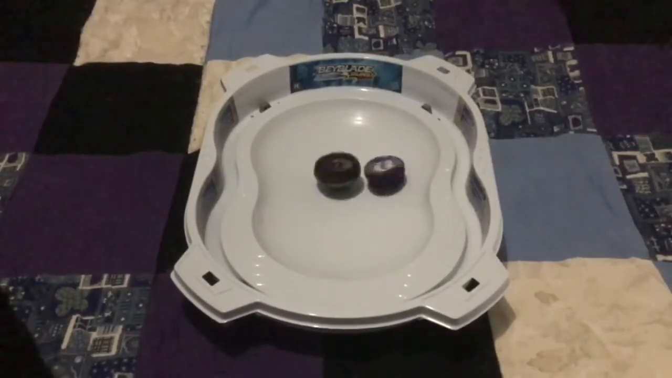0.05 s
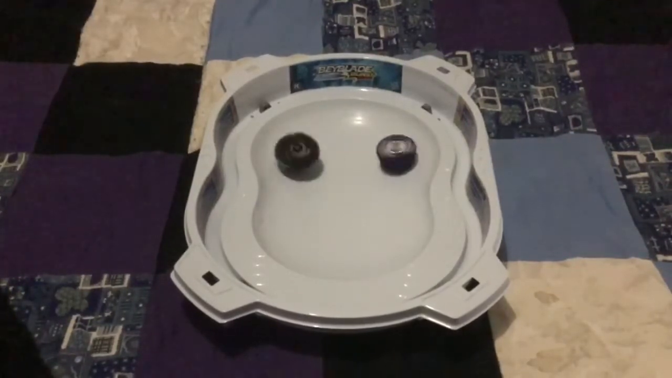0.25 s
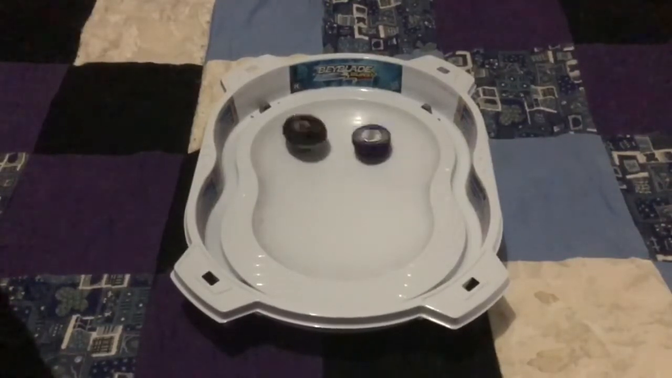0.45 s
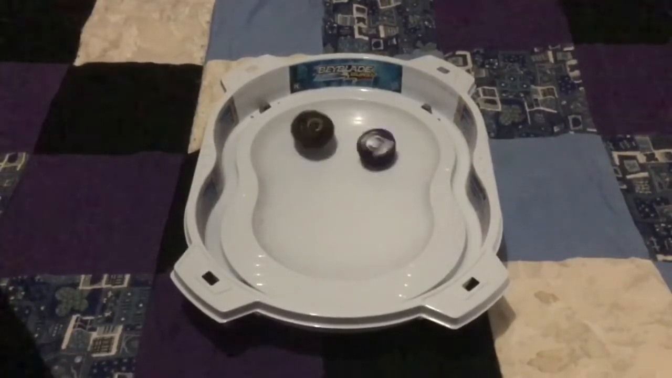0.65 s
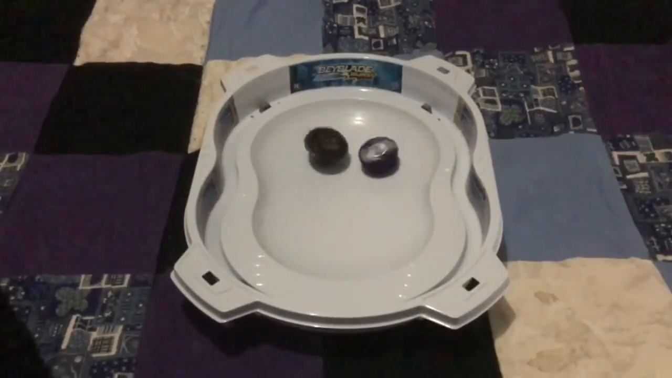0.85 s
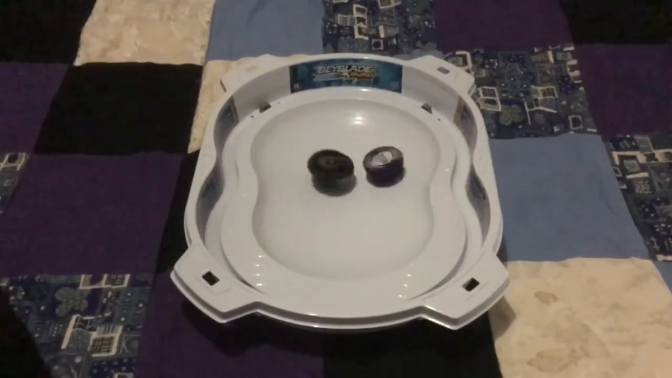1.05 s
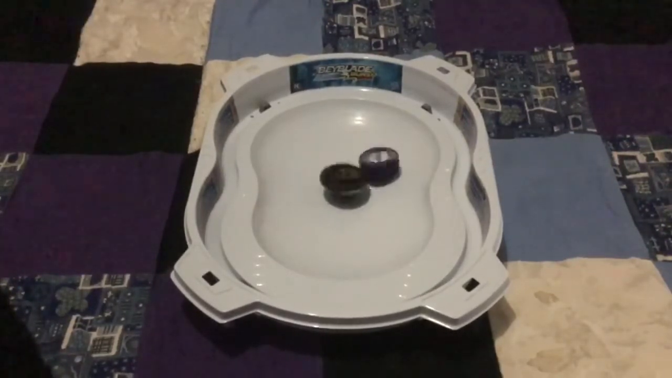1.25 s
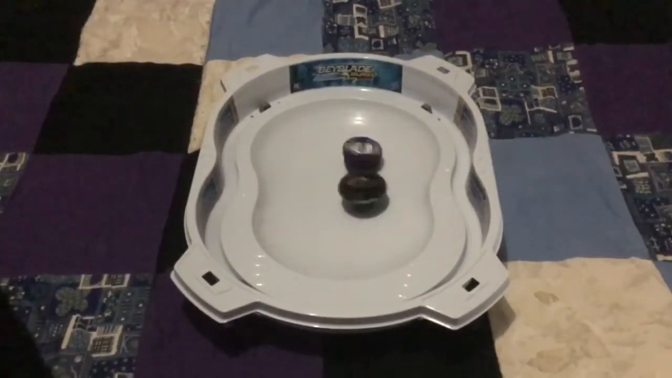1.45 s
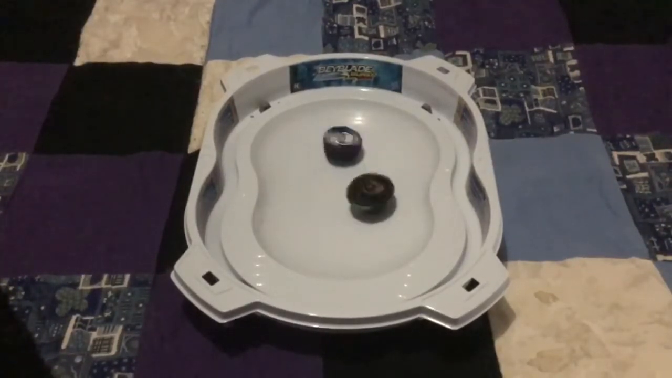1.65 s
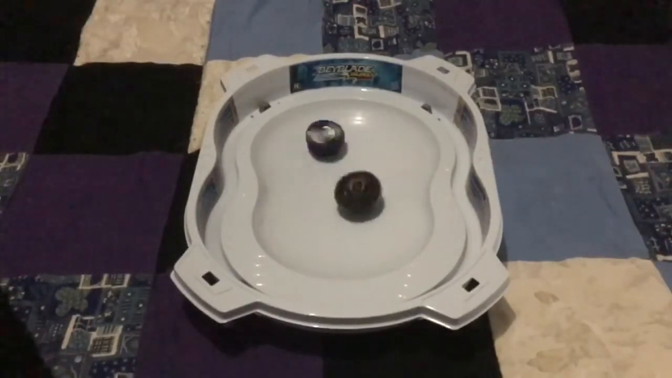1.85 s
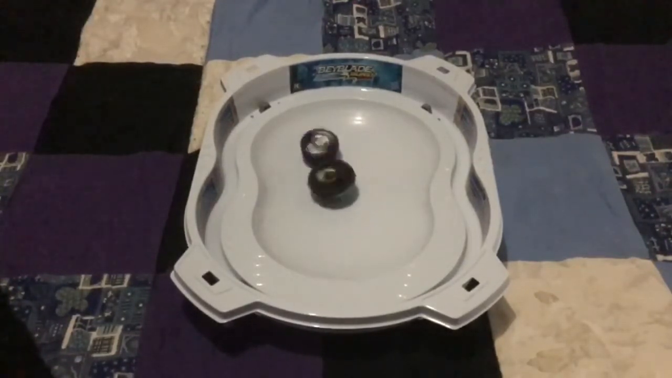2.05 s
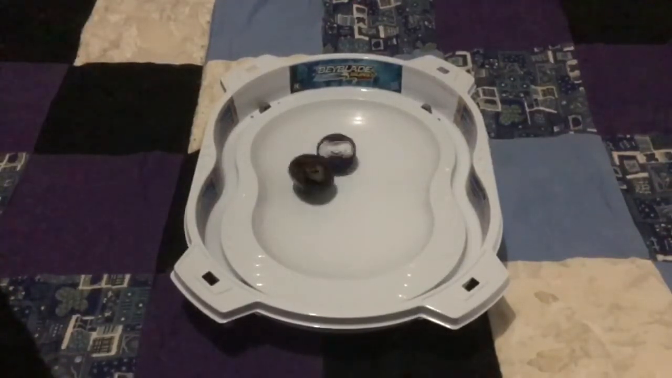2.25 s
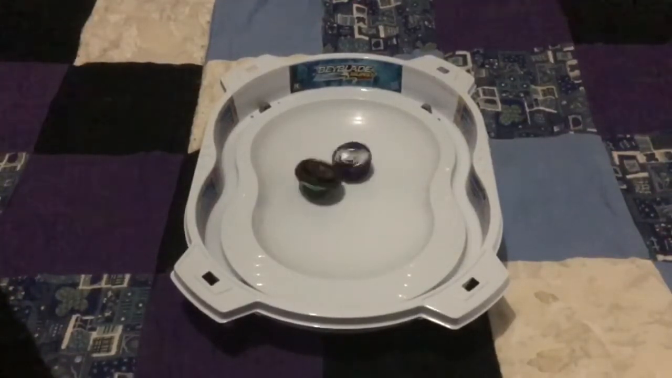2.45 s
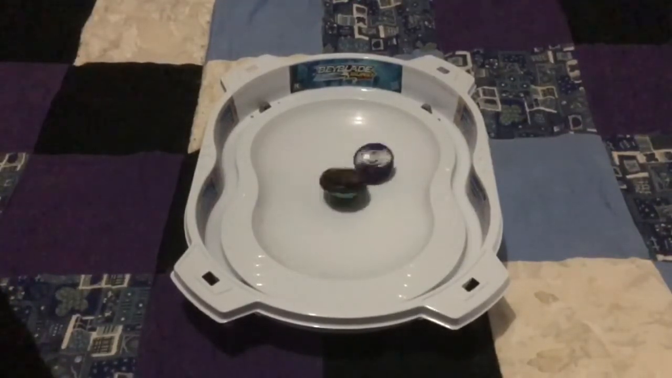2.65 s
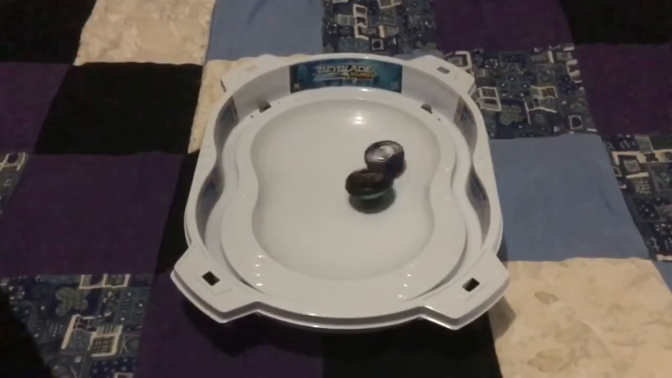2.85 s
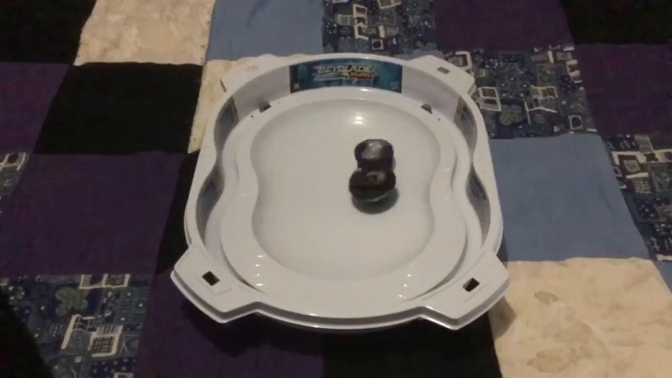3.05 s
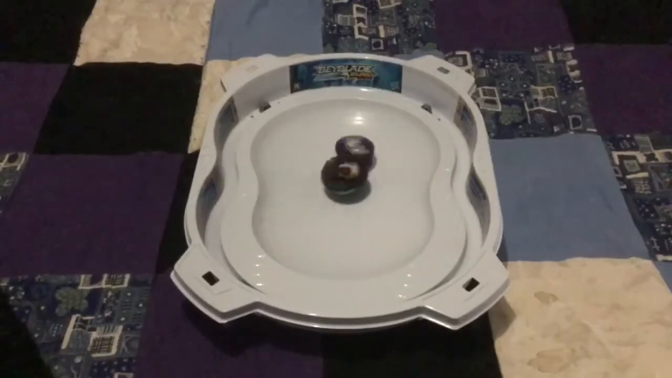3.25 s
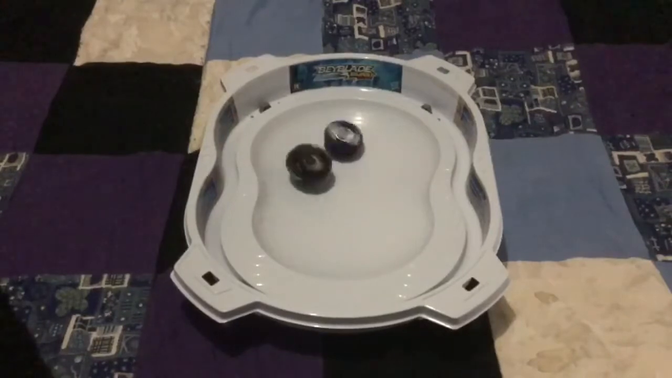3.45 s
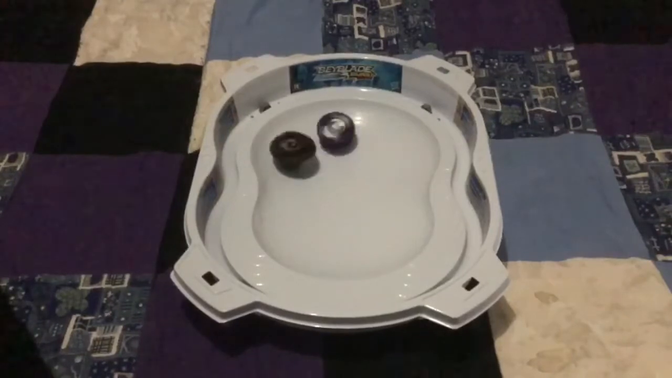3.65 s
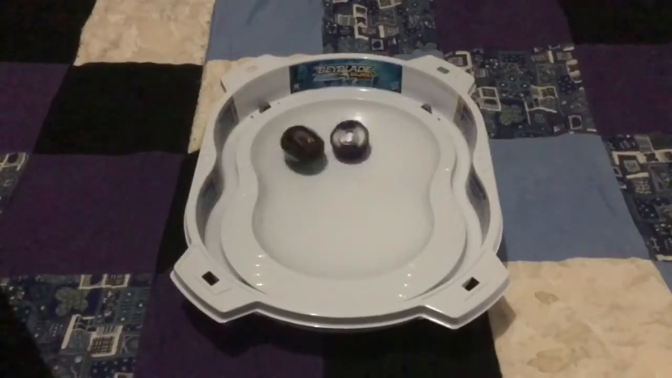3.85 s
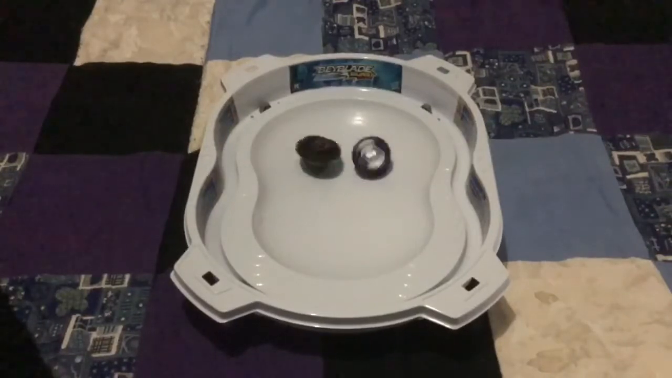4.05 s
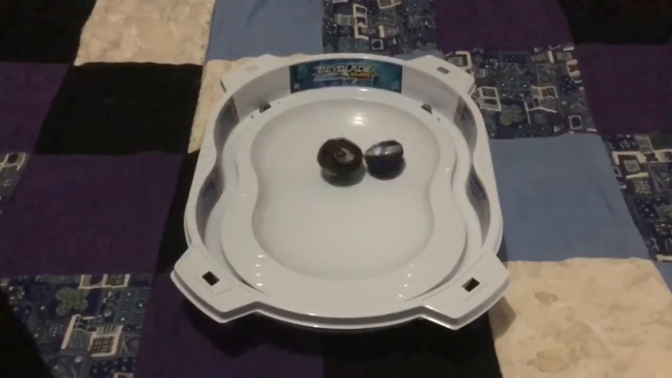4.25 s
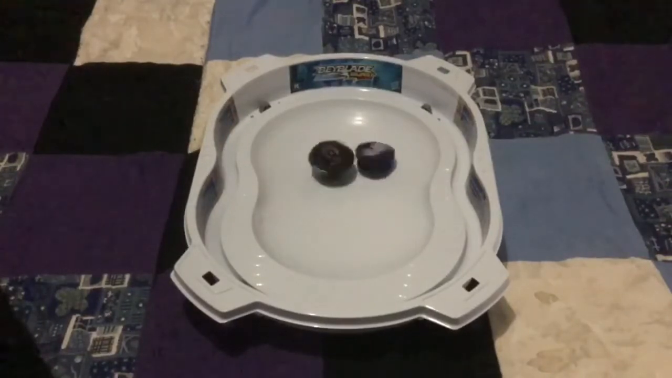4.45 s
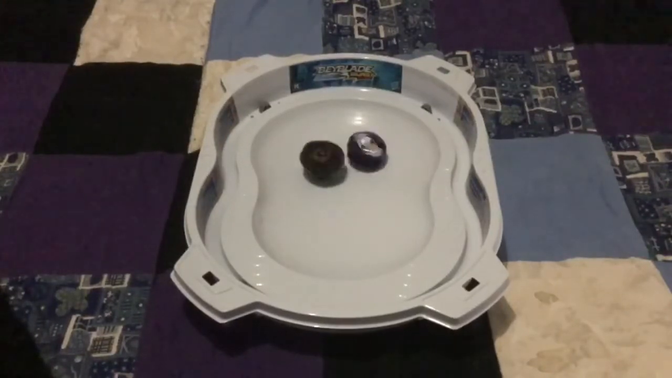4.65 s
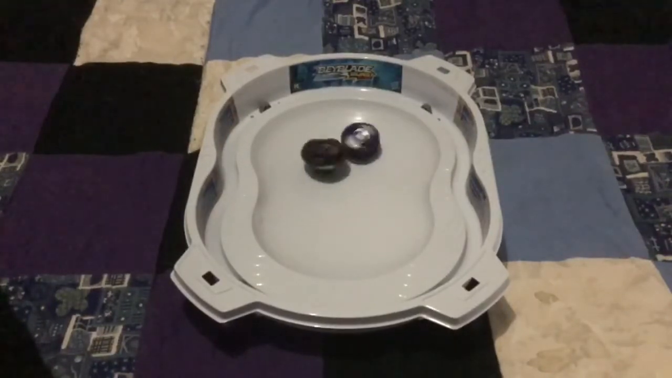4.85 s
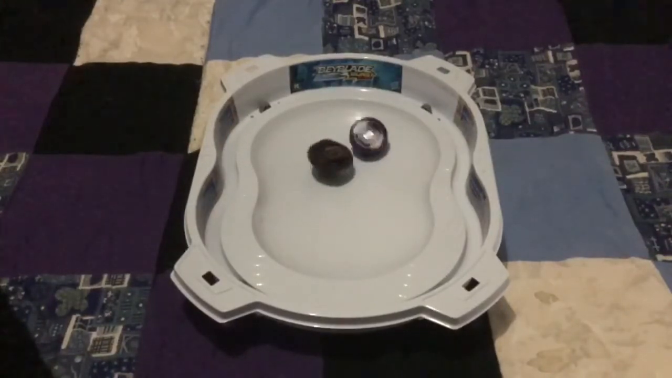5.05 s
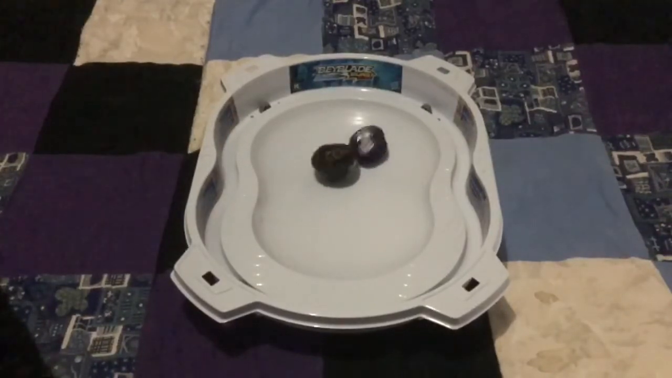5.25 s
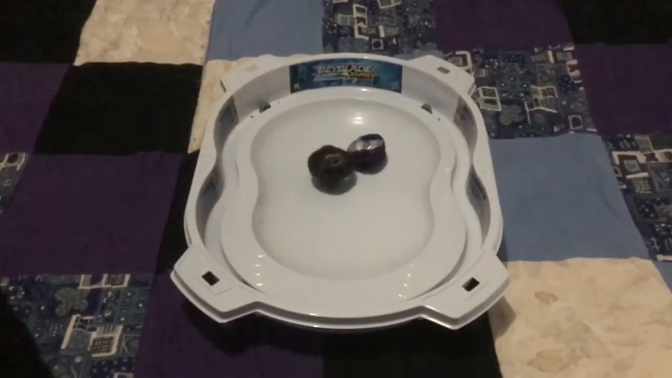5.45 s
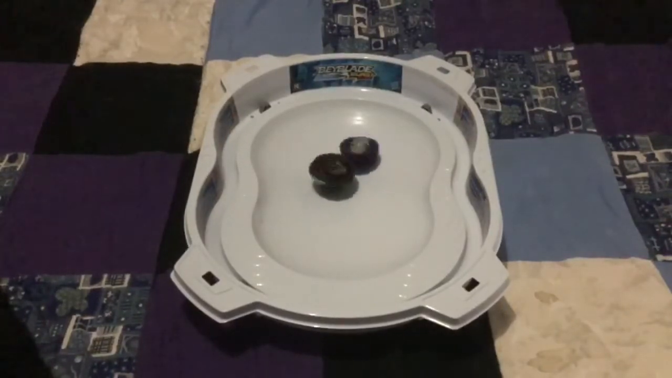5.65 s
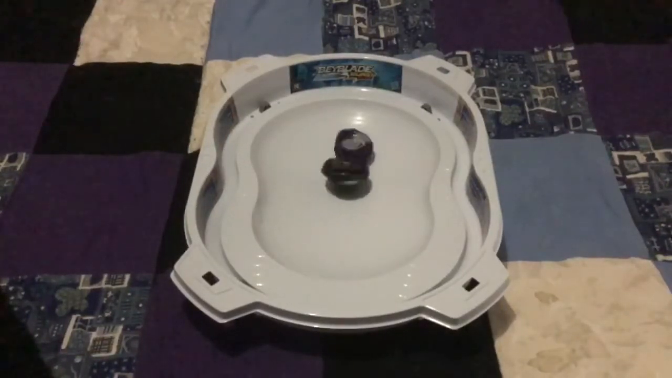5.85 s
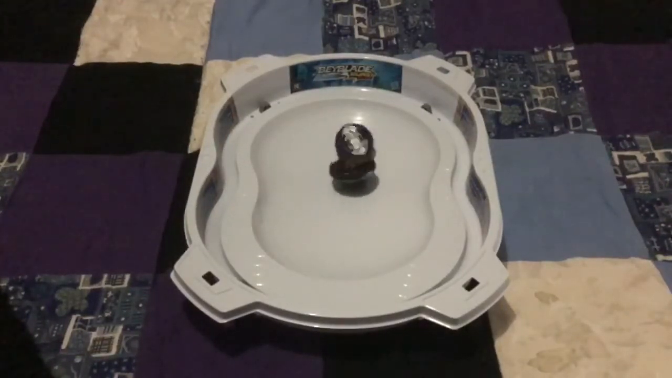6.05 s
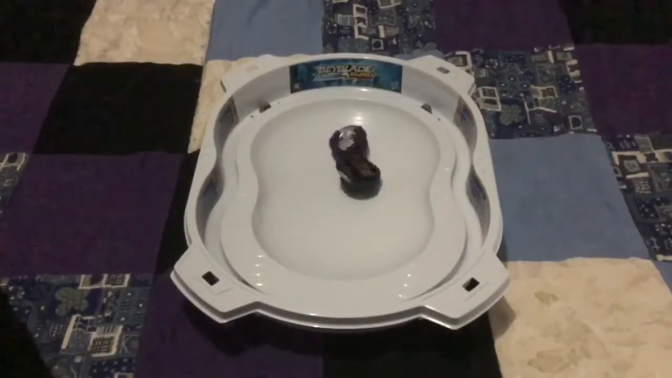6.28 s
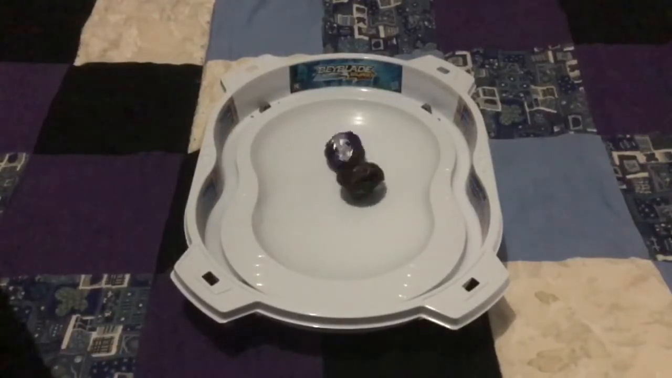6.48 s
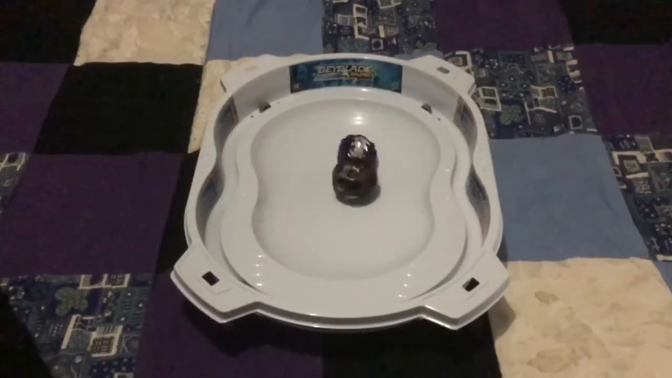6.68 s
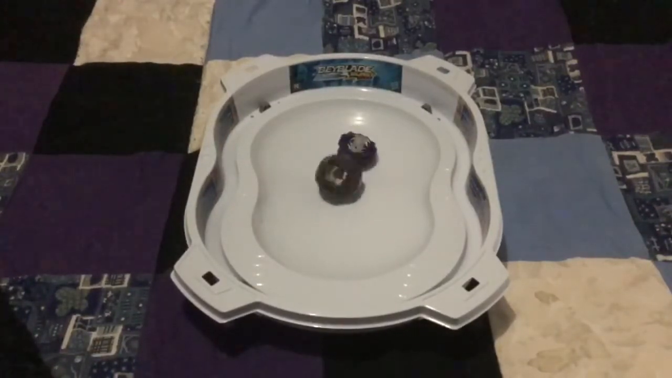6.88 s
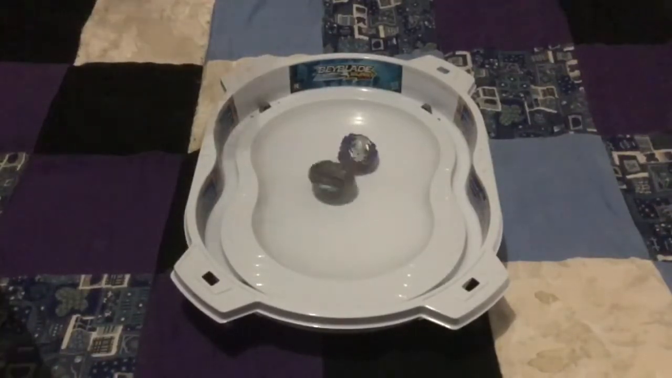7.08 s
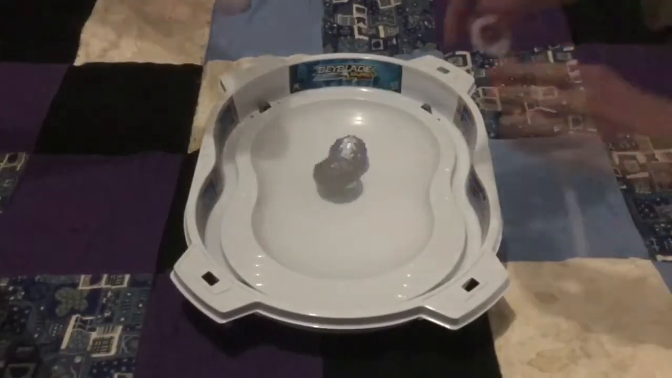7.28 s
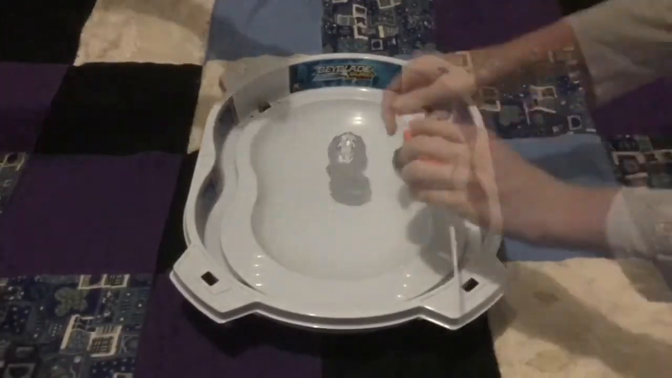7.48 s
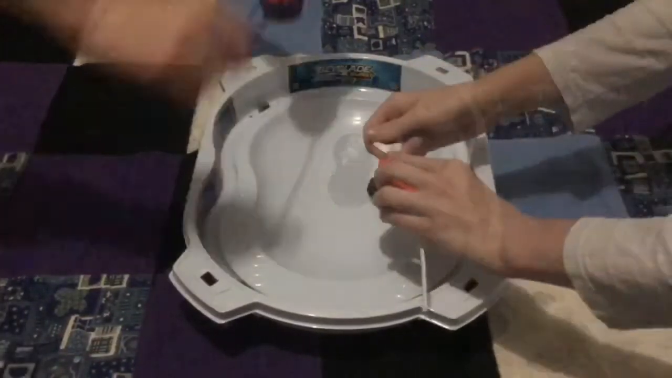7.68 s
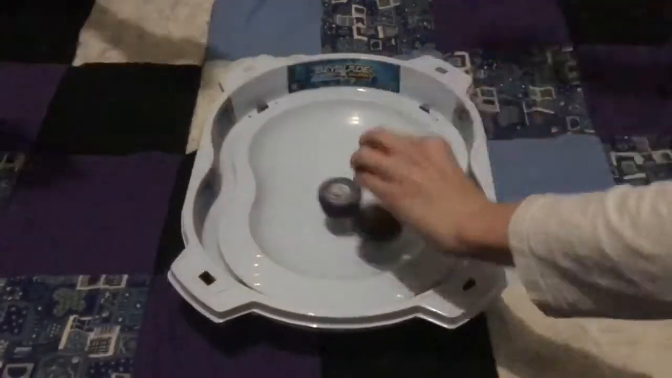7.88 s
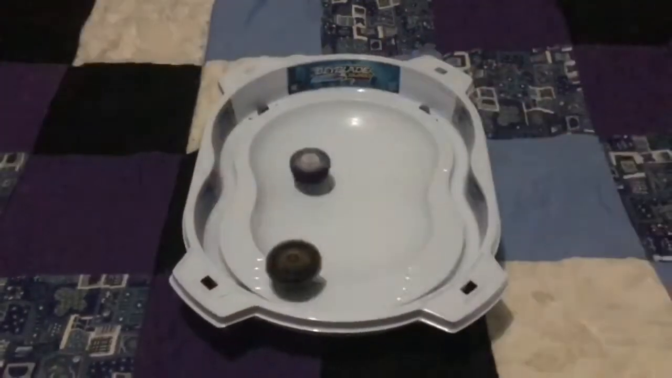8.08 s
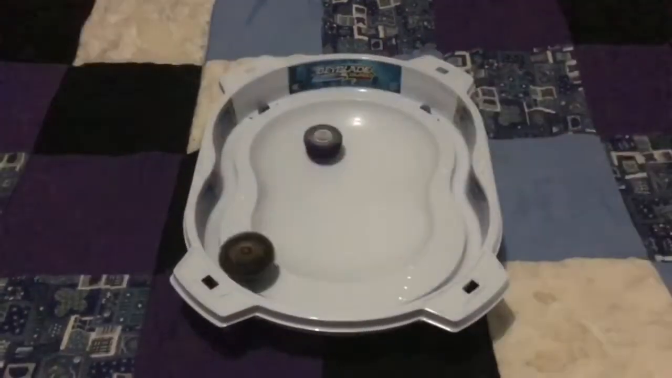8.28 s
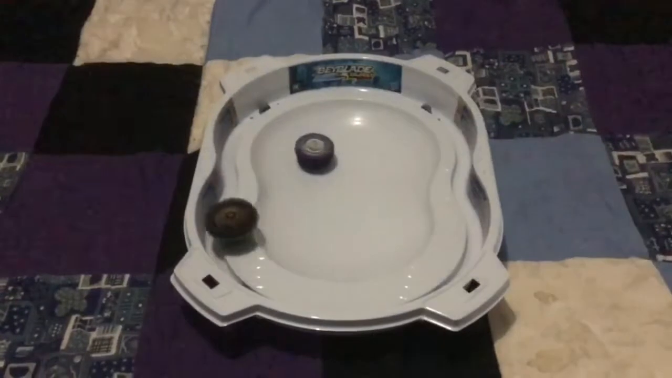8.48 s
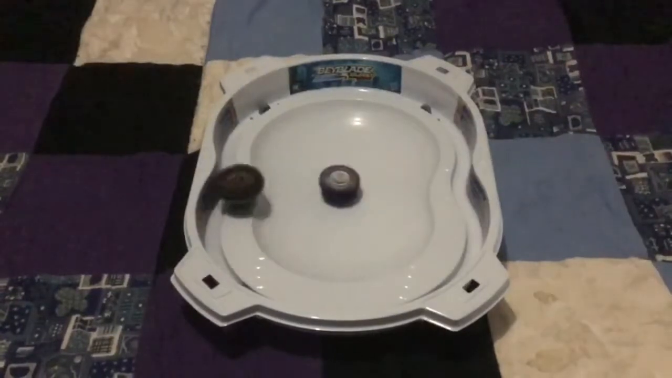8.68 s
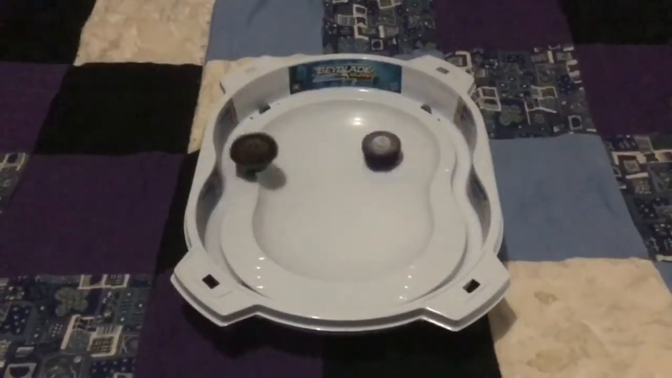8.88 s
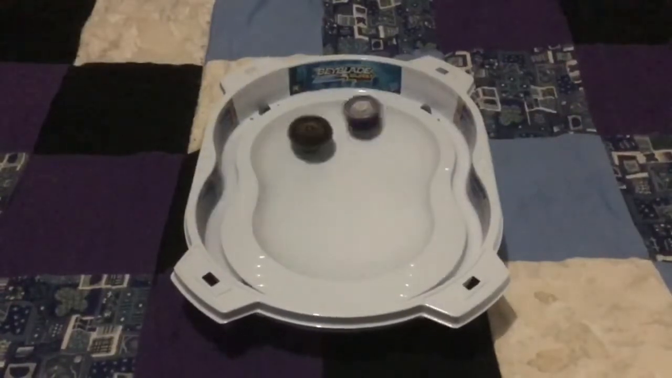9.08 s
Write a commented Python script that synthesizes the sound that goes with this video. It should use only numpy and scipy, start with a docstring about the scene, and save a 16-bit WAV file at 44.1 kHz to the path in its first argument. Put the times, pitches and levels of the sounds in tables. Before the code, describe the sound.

Close view of two metal-ringed tops in a hollow plastic bowl in a small soft room. Bright clashes come first, then lighter, quicker ticks and rubbing over a faint unsteady hum. After a quiet lull, toothed cords zip through launchers, new tops land with loud cracks and thumps, roll around, knock the wall and end in a harsh buzzing scrape and heavy smacks.

```python
"""Metal-ringed spinning tops clash rim on rim in a thin plastic bowl: bursts of noise crack and metal rings on.
Their tips make the bowl hum and rumble: a low tone and noise through the bowl's resonances, with rims rubbing.
Then toothed cords rattle and whine through two launchers: random tiny impacts through resonances.
New tops drop in, bounce and scrape the wall: more blows, and a rough buzz of ridges.
Short echoes of a small soft room and faint noise for its air lie around it all."""
import sys
import numpy as np
from scipy import signal
from scipy.fft import rfft, irfft, next_fast_len
from scipy.io import wavfile
from scipy.ndimage import map_coordinates

SR = 44100
rng = np.random.default_rng(int(sys.argv[2]) if len(sys.argv) > 2 else 0)


def transcribe(u):
    """Save the signal u as a 16-bit wav file named by the first command-line argument.

    u: samples, shape (n,) or (channels, n), limited to [-1, 1]; the rate is SR.
    q: integer samples, one column per channel.
    """
    v = np.clip(np.atleast_2d(u).T, -1, 1)
    q = np.round(v * 32767).astype(np.int16)
    wavfile.write(sys.argv[1], SR, q)


def amplitude_ratio(level_db):
    """Convert a level in decibels to the matching linear amplitude (field) ratio."""
    exponent = np.asarray(level_db, float) / 20
    return 10 ** exponent


N = 402191  # samples, about 9.1 s

# Rim clashes, landings and wall knocks; levels before the trims in the functions:
# start_s, crack_db, bright_db (treble setting), wall_db (wall knock), floor_db (floor thump)
BLOWS = [(0.0235, -17, 2.5, -25, -34), (0.4736, -20.5, 0.5, -34.5, -30), (0.4789, -13.5, -0.5, -28, -24),
         (0.885, -20, -1.5, -36.5, -25), (1.2521, -30.5, -3, -35.5, -37.5),
         (1.5193, -46.5, -11.5, -61, -43), (1.5414, -50.5, -8, -68, -56), (1.5666, -51, -6.5, -67, -54),
         (2.071, -32, -3, -41, -26), (2.079, -26.5, -3, -29, -25), (2.0942, -20, -2, -31.5, -25),
         (2.125, -23, -3.5, -30.5, -28), (2.4281, -34.5, -4, -44.5, -49), (2.4493, -26, -3, -39, -31),
         (2.5187, -36.5, -1, -61, -47), (2.5257, -25.5, -1.5, -41.5, -36.5), (3.222, -33, -5, -44, -41.5),
         (3.277, -27.5, -4, -37, -34.5), (3.3264, -40.5, -7, -36.5, -33.5),
         (3.697, -26, -2.5, -39.5, -26.5), (3.7076, -27, -3.5, -41, -32), (3.747, -47, -10, -50, -25.5),
         (3.7551, -20, -1.5, -27, -53), (3.8237, -32.5, -9.5, -29.5, -32), (3.8459, -33, -13, -46, -32),
         (3.8702, -31.5, -17, -51, -27), (3.91, -38.5, -9, -46, -28), (3.9409, -34, -9, -34.5, -45),
         (3.983, -39, -23, -51, -28), (4.0145, -37.5, 2, -48, -30.5), (4.049, -33.5, -17, -48, -35),
         (4.075, -50.5, 6, -61, -32), (4.112, -40, -4, -52, -50), (4.117, -33.5, -1, -57, -43),
         (4.1386, -30.5, -8, -40.5, -51), (4.1574, -29.5, -2, -45, -32.5),
         (4.177, -18.5, -1.5, -31.5, -29.5), (4.378, -43.5, -6, -46, -37), (4.402, -66, -11.5, -40.5, -36),
         (4.4079, -42.5, -7, -53, -40), (4.428, -29, -4.5, -40, -36), (4.4664, -37.5, -7, -37, -30.5),
         (4.498, -29.5, -2, -38, -40), (4.5604, -50, -14, -46, -36.5), (4.8322, -34, -6.5, -45, -40),
         (4.863, -30.5, -2, -50, -33.5), (4.9277, -23.5, -3, -46, -29.5), (4.9602, -56, -26, -33, -33),
         (5.0378, -43.5, -10, -36, -35.5), (5.115, -49, -13, -52, -33.5), (5.1485, -39.5, -13, -35, -33),
         (5.1792, -39.5, -14, -42, -29.5), (5.204, -24, -3, -34, -29), (5.2884, -38, -11, -40, -29.5),
         (5.303, -25, -3.5, -42, -35), (5.3646, -35, -29, -40, -39), (5.3753, -26, -5, -34.5, -24),
         (5.409, -28.5, -3.5, -36.5, -52), (5.6293, -40, -19, -46, -39), (5.6596, -41.5, -5, -43, -36),
         (5.688, -27.5, -4, -52, -47), (5.71, -40, -16, -37, -28), (5.8497, -28, -6, -36, -33),
         (5.904, -39, -15, -36.5, -35), (5.92, -40.5, -12, -39, -39), (6.053, -47.5, -19, -44, -38),
         (6.1162, -28, -3, -36, -27), (6.147, -26.5, -8, -31.5, -28.5), (6.302, -47.5, -22, -54, -36.5),
         (6.4018, -48.5, -22, -48, -47), (6.4106, -45, -26, -45.5, -34), (6.5686, -49.5, -26, -48.5, -49),
         (6.7355, -42.5, -8, -46, -42.5), (6.763, -37.5, -4.5, -42.5, -43),
         (7.169, -37.5, -7.5, -41, -36.5), (7.243, -35, -8, -43.5, -37), (7.356, -37.5, -6, -43, -44),
         (7.6588, -20, 4.5, -25.5, -22.5), (7.7484, -41, -14.5, -54, -56), (7.7848, -17.5, -7, -16, -6),
         (7.8636, -3.5, 1, -10, -3.5), (7.927, -21.5, -36, -22, -25), (8.0067, -24.5, -9.5, -22.5, -19.5),
         (8.029, -42, -25, -22, -18.5), (8.1046, -34, -8.5, -33.5, -19.5), (8.1407, -39, -12, -38.5, -25.5),
         (8.1888, -36, -4, -38, -29.5), (8.2008, -19, -12, -14.5, -25), (8.2105, -21.5, -42, -20.5, -35.5),
         (8.3054, -48, -12, -47, -30), (8.3351, -46.5, -17, -40.5, -26), (8.386, -52, -10, -45, -36.5),
         (8.4073, -45, -26, -44, -37), (8.4926, -48.5, -16, -39, -40), (8.516, -46, -13, -46, -32.5),
         (8.5241, -16.5, -9, -14.5, -25), (8.534, -20.5, -7.5, -11.5, -19), (8.675, -48, -15.5, -51, -36),
         (8.7722, -46.5, -5.5, -55, -37.5), (8.8329, -50, -32, -27, -27.5), (8.843, -33, -35, -42, -24),
         (8.857, -38, -30, -37, -46), (8.868, -16.5, -26, -12, -40), (8.8817, -27, -46, -24, -23),
         (8.989, -16.5, -24.5, -16.5, -23.5), (9.014, -27, -7.5, -14, -22.5), (9.021, -2.5, 2, -15, -12),
         (9.0328, -38, -13.5, -2.5, -11), (9.054, -12, -32, -38, -36), (9.065, -33, -32, -26, -45),
         (9.107, -7, -19, -8, -22)]
# Ways the bowl's floor vibrates: pitch_hz, width_hz, level_db
FLOOR = [(91, 150, -10), (161.2, 73.4, 2.5), (303, 69, 2), (431.3, 30, 1), (501, 48, -4)]
# Ways the bowl's wall vibrates: pitch_hz, width_hz, level_db
WALL = [(492, 41, -5.5), (629, 55, 1.5), (957, 210, -11), (1170, 210, -5.5), (1873, 150, -5),
        (2527, 270, -9)]
# Ring tones of the metal: pitch_hz, level_db (relative to the blow's crack_db), t60_s (time to fade 60 dB)
METAL = [(3900, -38, .12), (5350, -34.5, .15), (6422, -45, 0.23), (7700, -45.5, .15), (11530, -39, .2),
         (12400, -38, .22)]


def unit(x):
    """Scales a sound to an average strength (rms) of 1."""
    return x / np.sqrt(np.mean(x ** 2) + 1e-20)


def peak(x):
    """Scales a sound so its largest swing is 1."""
    return x / np.max(np.abs(x))


def along(points, hz):
    """Reads a curve of (Hz, value) points on a logarithmic pitch axis."""
    f, v = np.transpose(points)
    return np.interp(np.log(hz + 1), np.log(f + 1), v)


def curves(rows, outside=None):
    """Gives one value per sample for each column after the time."""
    s, *cols = np.transpose(rows)
    return [np.interp(np.arange(N) / SR, s, c, outside, outside) for c in cols]


def wobble(rate):
    """A smooth random curve through rate random points a second."""
    points = rng.standard_normal(int(N * rate / SR) + 4)
    return map_coordinates(points, [np.arange(N) * rate / SR])


def held(rows, rise_db_per_s, fall_db_per_s):
    """Gain over time of (start, length, dB) contacts that rise, hold and fade."""
    t = np.arange(N) / SR
    gain = np.zeros(N)
    for s, length, db in rows:
        before = rise_db_per_s * np.maximum(s - t, 0)
        after = fall_db_per_s * np.maximum(t - s - length, 0)
        gain += amplitude_ratio(db - before - after)
    return gain


def filtered(x, response):
    """Changes the strength and timing of each frequency by a complex response."""
    m = next_fast_len(len(x) + 8192)
    return irfft(rfft(x, m) * response(np.fft.rfftfreq(m, 1 / SR)), m)[:len(x)]


def coloured(x, spectrum):
    """Shapes a sound by a (Hz, dB) spectrum."""
    return filtered(x, lambda hz: amplitude_ratio(along(spectrum, hz)))


def resonant(x, modes, scatter_db=0):
    """Makes x ring in (Hz, width, dB) modes; each contact point drives them at other strengths."""
    gains = amplitude_ratio(scatter_db * rng.standard_normal(len(modes)))

    def response(f):
        total = 0
        for k, (centre, width, db) in enumerate(modes):
            mode = 1j * f * width / (centre * centre - f * f + 1j * f * width)
            total = total + (-1) ** k * gains[k] * amplitude_ratio(db) * mode  # neighbours have opposite signs
        return total

    return filtered(x, response)


def grit(rate, spread_db):
    """Random tiny impacts of uneven size, on average rate a second."""
    hits = (rng.random(N) < rate / SR) * rng.choice([-1, 1], N)
    return hits * amplitude_ratio(spread_db * np.minimum(rng.exponential(size=N), 3))


def echoes(x):
    """Adds a new random room tail in which each frequency dies at its own speed; the tail's energy is 1."""
    # How long the room rings: pitch_hz, t60_s (time to fade 60 dB)
    fade_times = [(100, 0.4), (260, 0.078), (700, 0.23), (1840, 0.21), (4850, 0.17), (12800, 0.14)]
    hz, t, z = signal.stft(rng.standard_normal(SR // 2), SR, nperseg=256)
    fading = amplitude_ratio(-60 * t / along(fade_times, hz)[:, None])
    tail = signal.istft(z * fading, SR, nperseg=256)[1]
    return signal.fftconvolve(x, np.pad(tail / np.linalg.norm(tail), (180, 0)))  # starts 4 ms late


def blows():
    """Each blow cracks at the rims, knocks wall and floor and fills the room."""
    # Colour of a clash: pitch_hz, level_db
    rim_colour = [(530, -23), (900, -28.5), (1190, -7), (2040, -8), (3590, 2), (4520, 3.5), (5610, 4),
                  (6250, 0), (15100, -6), (16000, -25.5)]
    out, t = np.zeros(N + SR), np.arange(SR // 8) / SR
    for s, crack_db, bright_db, wall_db, floor_db in BLOWS:
        treble = [(2600, 0.01), (11000, 1.9 * bright_db + 3.5)]  # (Hz, dB)
        colour = lambda hz: amplitude_ratio(along(rim_colour, hz) + along(treble, hz))
        burst = np.clip(t / .0006, 0, 1) * amplitude_ratio(-60 * t / .02)  # rims skid for a few milliseconds
        crack = peak(filtered(burst * rng.standard_normal(len(t)), colour))
        wall_push = amplitude_ratio(-60 * t / .006) * rng.standard_normal(len(t))
        knock = peak(resonant(wall_push, WALL, scatter_db=2.5))
        thump = peak(resonant(amplitude_ratio(-60 * t / .008), FLOOR, scatter_db=5.5))  # one slow push on the floor
        body = amplitude_ratio(wall_db + 0.5) * knock + amplitude_ratio(floor_db - 1.88) * thump
        # the bare contact, heard all round the room
        click = peak(filtered(1. * (np.arange(len(t)) == 64), colour))
        direct = amplitude_ratio(crack_db + 2.5) * crack + amplitude_ratio(crack_db + 2.0) * click + body
        wet = echoes(amplitude_ratio(crack_db - 3.5) * crack + amplitude_ratio(crack_db + 8.5) * click + amplitude_ratio(-1) * body)
        for part in (direct, wet):
            out[round(s * SR):][:len(part)] += part
    return out[:N]


def metal_rings():
    """Every blow rings the metal in fading tones that beat as the top turns."""
    out, t = np.zeros(N + SR), np.arange(SR // 2) / SR
    hz, level_db, t60 = np.transpose(METAL)[:, :, None]
    tones = amplitude_ratio(level_db - 60 * t / t60) * (1 - np.exp(-t / 0.001)) * np.sin(2 * np.pi * hz * t)
    for s, crack_db, *_ in BLOWS:
        scatter_db = 4 * rng.standard_normal(len(METAL))  # from blow to blow
        beat = 1 + 0.42 * np.sin(2 * np.pi * (38 * t + rng.standard_normal()))
        out[round(s * SR):][:len(t)] += beat * (amplitude_ratio(crack_db + scatter_db) @ tones)
    return out[:N]


def lingering_notes():
    """Some blows leave one tone of the bowl, a metal ring or a launcher fading away."""
    # Tones left ringing: start_s, pitch_hz, level_db, t60_s (time to fade 60 dB)
    notes = [(.024, 6500, -70, 0.74), (.479, 6425, -48.5, 0.42), (2.093, 6420, -59, 0.62),
             (5.41, 6420, -67, .55), (7.747, 5050, -26.5, 0.035), (7.77, 4800, -31, .04),
             (0.023, 101, -38, 0.49), (.479, 101.5, -29, 0.12), (2.084, 100, -32.5, .35),
             (4.469, 606, -29.5, 0.053), (5.039, 480, -32, 0.041), (5.376, 330, -29, 0.034),
             (5.63, 565, -30, 0.038), (7.661, 91, -27, 0.083), (7.789, 103, -15.5, 0.24),
             (7.866, 104, -26, .18), (7.926, 1150, -27, 0.19), (8.021, 101, -22.5, 0.23),
             (8.112, 100, -21.5, 0.096), (8.201, 1264, -10, 0.096), (9.025, 87, -35, 0.11)]
    out, t = np.zeros(N + SR), np.arange(SR // 2) / SR
    for s, hz, db, t60 in notes:
        tone = amplitude_ratio(db - 60 * t / t60) * (1 - np.exp(-t / 0.001)) * np.sin(2 * np.pi * hz * t)
        if hz > 6000:  # the high metal tones beat
            tone = tone * (1 + .55 * np.sin(2 * np.pi * 40 * t))
        out[round(s * SR):][:len(t)] += tone
    return out[:N]


def table_thuds():
    """Hard blows thud through the table: low tones whose pitch falls as the table settles."""
    # Thuds: start_s, pitch_hz (reached after the fall), level_db
    thuds = [(0.482, 45, -21.5), (7.661, 60, -23.5), (7.786, 70, -33), (9.028, 55, -4.5)]
    out, t = np.zeros(N + SR), np.arange(SR // 2) / SR
    for s, hz, db in thuds:
        cycles = hz * t + 0.89 * (1 - np.exp(-t / 0.0086))
        out[round(s * SR):][:len(t)] += amplitude_ratio(db - 60 * t / 0.092) * np.sin(2 * np.pi * cycles)
    return out[:N]


def spell_gain(column, idle_db):
    """Loudness of contact: a faint idle level while tops spin apart, more as they lean or climb the slope."""
    # Spells of leaning together or running up the slope:
    # start_s, length_s, rub_db (rims rubbing), rumble_db (tips); levels before later trims
    spells = np.array([(1.364, 0.23, -65, -71.5), (3.292, .1, -60, -64), (3.842, 0.2, -50, -49.5),
                       (4.078, .12, -57.5, -51), (4.452, 0.071, -55, -51.5), (4.97, 0.16, -59, -59.5),
                       (5.312, .05, -53, -53), (5.666, 0.1, -50, -49), (5.935, .28, -58.5, -56.5),
                       (6.362, 0.19, -63, -60.5), (7.72, .14, -58, -66), (7.863, 0.036, -34.5, -50.5),
                       (8.188, 0.092, -50.5, -45.5), (8.38, 0.246, -59.5, -59.5), (8.62, 0.28, -59, -55),
                       (8.9, 0.11, -40, -28), (9.11, .03, -39.5, -43)])
    return amplitude_ratio(idle_db) + held(spells[:, [0, 1, column]], rise_db_per_s=295, fall_db_per_s=205)


def bowl_hum():
    """Wobbling tips hold the floor's two lowest modes in motion: an unsteady tone and a narrow noise."""
    # Hum over time: time_s, pitch_hz (lowest mode), level_db (lowest mode), level_db (second mode)
    hum_course = [(0.0, 100.8, -67, -58.5), (0.42, 102.5, -49, -50), (0.6, 102.2, -71, -57),
                  (1.2, 101, -67.5, -75), (1.36, 87.9, -58, -57), (1.43, 85.88, -52, -43.5),
                  (1.7, 98.85, -58, -63), (2.3, 102, -54.5, -81), (3.1, 101, -53.5, -71),
                  (3.4, 99.57, -51.5, -54.5), (3.85, 100.1, -51.5, -53.5), (3.96, 99.4, -46, -34),
                  (4.1, 98.84, -42.5, -73), (4.4, 98.5, -40, -58), (5.46, 95.3, -38, -60),
                  (5.8, 93.93, -44, -49.5), (6.1, 92.5, -44, -52.5), (6.7, 94.26, -43.5, -57),
                  (6.82, 95.9, -53, -66), (6.96, 99.9, -43.5, -61.5), (7.08, 96.94, -57.5, -64.5),
                  (7.6, 92, -59, -72.5), (8.15, 100.1, -43, -37.5), (8.36, 112.1, -37.5, -41.5),
                  (8.56, 107.2, -40, -54), (8.68, 100, -51.5, -60.5), (8.89, 99.2, -32, -47),
                  (9.12, 84, -52, -56)]
    # The floor's second mode under a steady tip: pitch_hz, width_hz, level_db
    second_mode = [(158, 44, 0)]
    hz, hum_db, second_db = curves(hum_course)
    cycles = np.cumsum(hz + 1.5 * wobble(18)) / SR
    lowest = amplitude_ratio(hum_db + 1.0 * wobble(12.0)) * np.sqrt(2) * np.sin(2 * np.pi * cycles)
    narrow_noise = resonant(resonant(rng.standard_normal(N), second_mode), second_mode)
    return lowest + amplitude_ratio(second_db + 1.9 * wobble(8)) * unit(narrow_noise)


def tip_rumble():
    """Tips rumble over the floor's texture: tiny impacts ring in modes of floor and wall."""
    rumble = unit(resonant(grit(1200, spread_db=1.5), [*FLOOR[2:], *WALL[1:2]]))
    return spell_gain(3, idle_db=-68.5) * amplitude_ratio(2.16 * wobble(25)) * rumble


def rim_rub():
    """Close rims brush in brief contacts, and the metal rings sing along."""
    # Colour of rubbing rims: pitch_hz, level_db
    rub_colour = [(470, -39), (800, -1), (2910, 4), (3740, -5), (4240, -2), (5200, 0.5), (5900, -8.5),
                  (12900, -22), (16000, -20)]
    bumps = np.abs(grit(100, spread_db=3.5))
    touches = .25 + filtered(bumps, lambda f: 110 / (1 + 2j * np.pi * f * .003))  # each dies in about 3 ms
    brushing = unit(coloured(touches * grit(4000, spread_db=2), rub_colour))
    rub = spell_gain(2, idle_db=-78.5) * amplitude_ratio(3.1 * wobble(30)) * brushing
    singing_modes = [(hz, 3.9 / t60, 1.0 * hz / 1000 - 4) for hz, _, t60 in METAL]
    rub = rub + amplitude_ratio(7) * resonant(rub, singing_modes)
    return amplitude_ratio(-3.5) * rub + amplitude_ratio(-6.5) * echoes(rub)[:N]


def cords():
    """Cord teeth rattle past the launcher gears too fast to count and make them whine."""
    # Cords running through the gears: time_s, level_db (before later trims)
    cord_level = [(7.535, -64), (7.562, -63.5), (7.57, -42.5), (7.63, -25.5), (7.636, -24), (7.655, -23.5),
                  (7.661, -10), (7.675, -7.5), (7.69, -15), (7.73, -30.5), (7.78, -33.5), (7.808, -28),
                  (7.813, -12.5), (7.83, -9.5), (7.858, -26.5), (7.9, -40.5), (7.99, -63.5)]
    # Colour of the rattle: pitch_hz, level_db
    gear_colour = [(470, -38), (800, -11), (1570, -12.5), (2950, 3), (3380, 3), (5310, 8.5), (7540, 5.5),
                   (16000, -3.5)]
    # Whining gear tones: pitch_hz, width_hz, level_db
    whine_modes = [(2790, 150, -6), (4220, 50, 4), (5300, 130, -4), (6200, 85, -17.5), (7360, 120, -4.5)]
    level_db, = curves(cord_level, outside=-120)
    teeth = grit(5000, spread_db=-1.5)
    whine = amplitude_ratio(-8 + 5 * wobble(50)) * unit(resonant(teeth, whine_modes))
    rattle = unit(coloured(teeth, gear_colour))
    direct = amplitude_ratio(level_db - 6 + 0.58 * wobble(110)) * (rattle + whine)
    return direct + amplitude_ratio(-10.5) * echoes(direct)[:N]


def grind():
    """The rim's ridges strike the wall one after another, a rough buzz that slows, over loose chatter."""
    # The top's rim passing the wall: time_s, rate_per_s (ridges a second, before a random wobble)
    ridge_rate = [(8.87, 324), (8.95, 316), (9.02, 312), (9.06, 293)]
    # Contacts with the wall: start_s, length_s, level_db (before later trims)
    contacts = [(8.873, 0.0097, -28), (8.91, 0.06, -19.5), (8.99, 0.0085, -15.5), (9.025, 0.007, -21.5),
                (9.057, 0.008, -14), (9.109, .02, -15.5)]
    # Colour of the buzz and chatter: pitch_hz, level_db
    buzz_colour = [(120, -34), (250, -3.5), (450, -6), (630, 2.5), (800, -12), (1250, 1), (1500, -12.5),
                   (1900, -6), (2500, -16), (3150, -4.5), (3700, -15.5), (5330, -21), (8740, -28),
                   (16000, -30.5)]
    # Wall tones that sing on under the grinding: pitch_hz, width_hz, level_db
    drone_modes = [(633, 21, -7.5), (1255, 35, -4.5), (1887, 120, -6.5), (3330, 100, -1.5)]
    rate, = curves(ridge_rate)
    passed = np.cumsum(rate * (1 + .035 * wobble(200))) / SR  # ridges so far
    strikes = np.diff(np.floor(passed), prepend=0) * amplitude_ratio(5.1 * rng.standard_normal(N))
    # bending waves in the wall: treble arrives first
    strikes = filtered(strikes, lambda hz: np.exp(-1.3j * np.sqrt(hz)))
    chatter = unit(coloured(grit(2500, spread_db=2.5), buzz_colour))
    buzz = unit(coloured(strikes, buzz_colour)) + amplitude_ratio(-6) * chatter
    pressing = held(contacts, rise_db_per_s=3000, fall_db_per_s=710)
    direct = pressing * amplitude_ratio(3.2 * wobble(80)) * buzz
    direct = direct + amplitude_ratio(3) * resonant(direct, drone_modes)
    return amplitude_ratio(-2) * direct + amplitude_ratio(-17.5) * echoes(direct)[:N]


def room_air():
    """Faint steady noise, mostly bass: the room's air."""
    # Colour of the room tone: pitch_hz, level_db (shape only)
    air_colour = [(18, -40), (32, -25.5), (55, -7), (106, -4), (153, -16), (666, -34), (913, -37),
                  (1250, -38.5), (8520, -56), (14000, -58), (16000, -58)]
    return amplitude_ratio(-55) * unit(coloured(rng.standard_normal(N), air_colour))


def scene():
    """Everything at one microphone, over faint room tone."""
    ringing = metal_rings() + lingering_notes() + table_thuds()
    tips = bowl_hum() + tip_rumble() + rim_rub()
    return (blows() + ringing + tips + cords() + grind() + room_air())[None]


def roll_off(x):
    """The treble ends steeply here."""
    return signal.sosfilt(signal.butter(12, 15900, fs=SR, output="sos"), x)


def record(dry):
    """The microphone drops the deepest bass; gain control ducks after loud moments and rounds off peaks."""
    x = filtered(dry[0], lambda hz: (1j * hz / (45 + 1j * hz)) ** 3)
    power = np.abs(filtered(x ** 2, lambda hz: 1 / (1 + 2j * np.pi * hz * 0.04)))  # recent loudness, 40 ms
    x = x * (1 + power / amplitude_ratio(-43.5)) ** -.2
    x = x / (1 + np.abs(x / .9) ** 4) ** (1 / 4)  # peaks stay below 0.9
    return roll_off(x[None])


dry = scene()
out = record(dry)
transcribe(out)
```